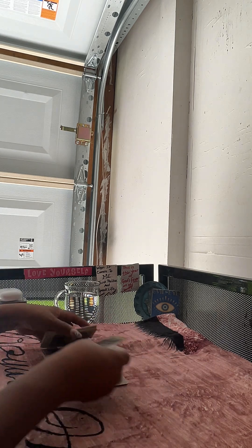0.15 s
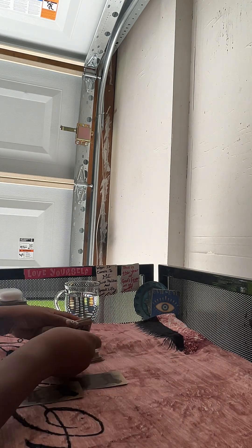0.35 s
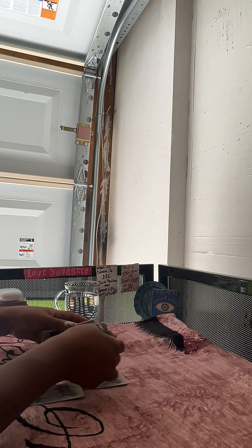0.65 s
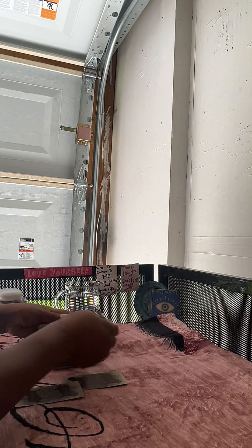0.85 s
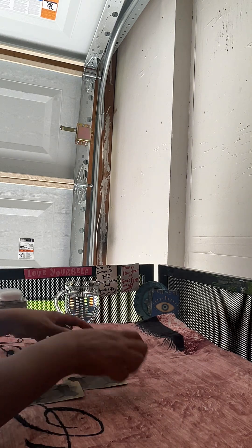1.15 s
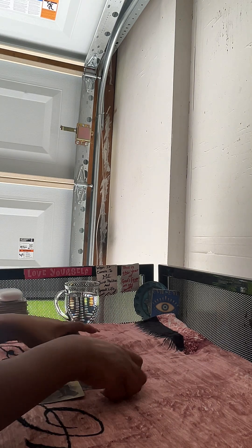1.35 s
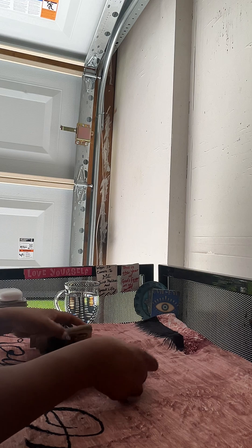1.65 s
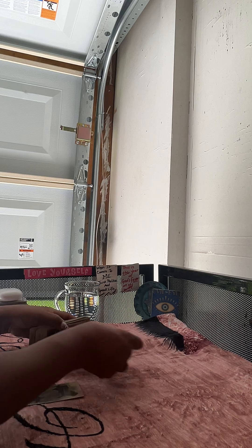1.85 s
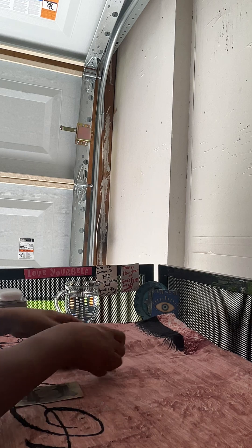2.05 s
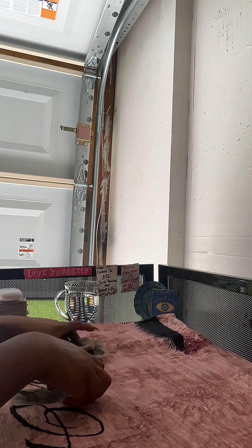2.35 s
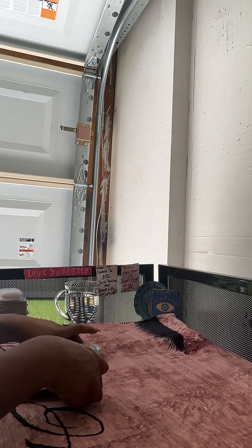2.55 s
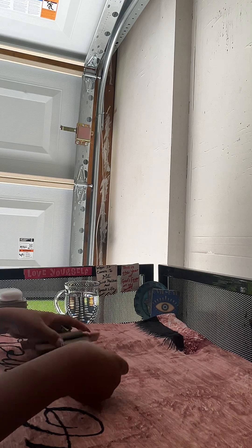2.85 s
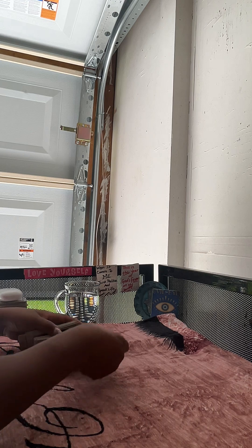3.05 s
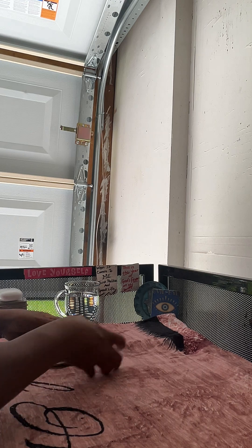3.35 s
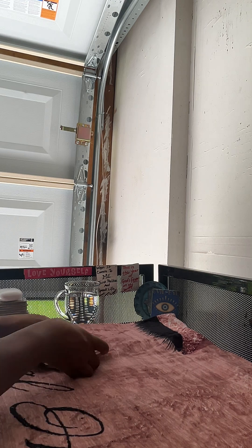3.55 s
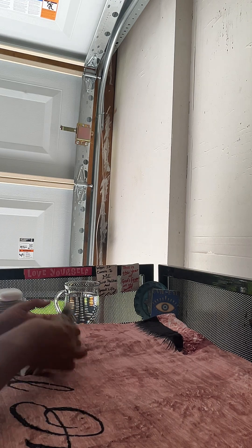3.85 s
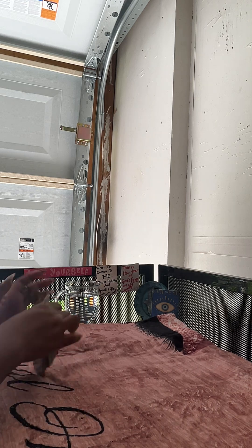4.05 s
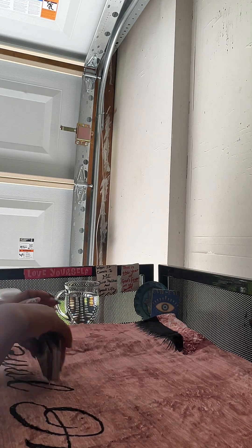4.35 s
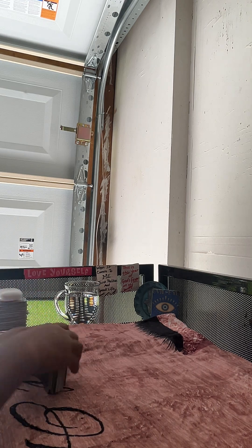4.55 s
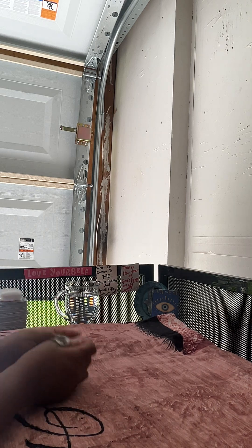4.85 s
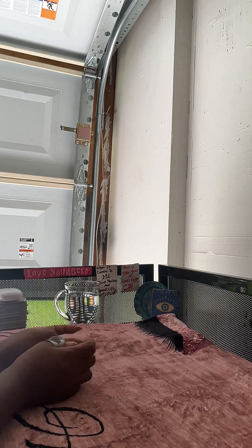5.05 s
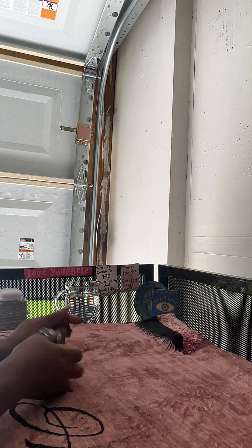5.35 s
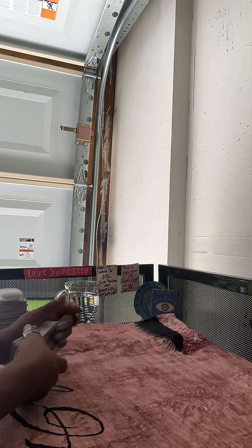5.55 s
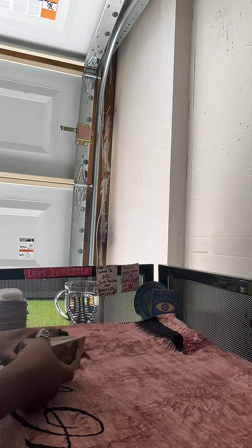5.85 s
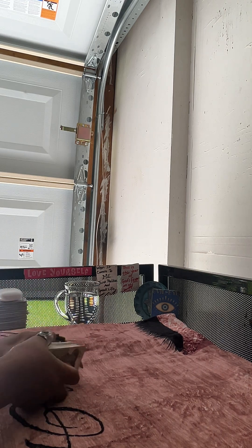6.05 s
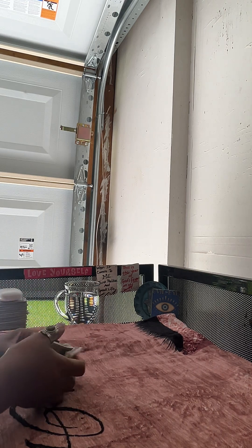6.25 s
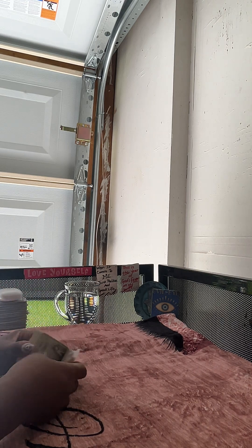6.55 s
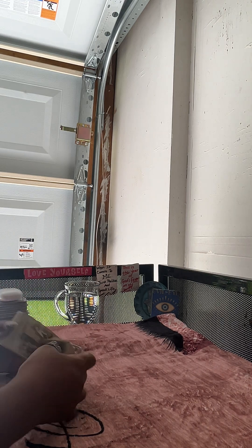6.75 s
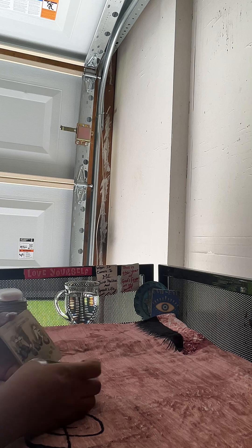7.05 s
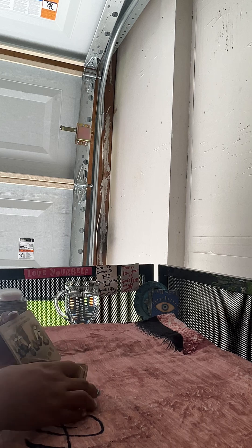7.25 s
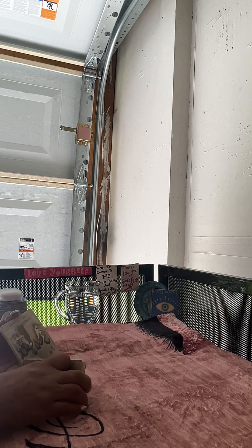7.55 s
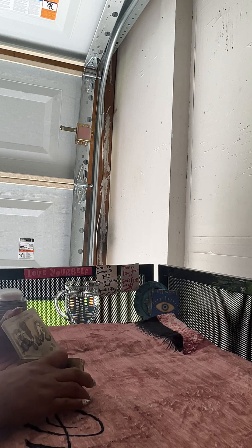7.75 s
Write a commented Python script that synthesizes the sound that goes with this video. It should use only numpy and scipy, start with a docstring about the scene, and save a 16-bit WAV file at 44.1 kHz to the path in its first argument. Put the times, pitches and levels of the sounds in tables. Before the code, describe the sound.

Playing cards are handled close to the microphone on a cloth-covered table in a quiet, hard-walled room. From the start, cards brush softly, tick as their edges catch and give small papery slaps, over a low rumble of hands leaning on the table. A very faint, thin insect buzz from outdoors fades away by about 3 seconds. A soft thump comes just after 2 seconds. At about 3.5 seconds the cards are swept together with a few slaps and a short scrape. Between 4 and 5 seconds hands and deck land with several dull thumps, amid more sliding and clicking. A faint high hiss appears near 2.6 and 5.8 seconds. From 6.2 to 6.5 seconds one quick riffle, a dense flurry of snaps and flaps, is by far the loudest sound. A few light touches follow, dying down before 8 seconds.

```python
"""A deck of cards is handled on a cloth-covered table in a hard-walled room, heard at two close ports.
At first a thin insect buzz from outdoors fades under the rumble, while cards brush, tick as their edges
catch and slap as air is squeezed from between them. From 2 s hands thump the table now and then, and
at 3.5 s the spread cards are swept together. One quick riffle stands out at 6.2-6.5 s; a few light
touches follow. A faint high hiss comes twice along the way, near 2.6 s and 5.8 s."""
import sys
import numpy as np
from scipy import signal
from scipy.fft import rfft, irfft, next_fast_len
from scipy.io import wavfile

SR = 44100
rng = np.random.default_rng(int(sys.argv[2]) if len(sys.argv) > 2 else 0)


def master(y):
    """Save y as 16-bit WAV."""
    cut = np.clip(np.atleast_2d(y).T, -1, 1)
    pcm = np.round(cut * 32767)  # scale
    wavfile.write(sys.argv[1], SR, pcm.astype(np.int16))


N = 348886

# Card edges catching, plus a few sharp returns of them from the near wall. Each row: start in seconds, snap
# level in dB, knock level in dB.
TICKS = [(0.3705, -36, -52), (0.405, -42, -53.5), (0.584, -40, -54.5), (0.9754, -39.5, -74),
         (0.99, -28, -61), (0.9967, -34, -65), (1.006, -42, -71), (1.013, -46, -69), (1.157, -43, -62),
         (1.201, -34.5, -52.5), (1.2804, -35.5, -42), (1.5067, -30, -55.5), (1.5988, -34, -42.5),
         (2.1195, -40.5, -52), (2.143, -37, -54), (2.2623, -38.5, -56), (2.3118, -39, -72),
         (2.451, -53, -77), (2.5074, -45, -40.5), (2.698, -40.5, -65), (3.241, -44, -48.5),
         (3.2851, -39.5, -57.5), (3.375, -52, -53), (3.3923, -35, -49.5), (3.4789, -50, -44.5),
         (3.6565, -37, -60), (3.8245, -33, -42), (3.9072, -50, -43.5), (4.1802, -38, -59),
         (4.8808, -41, -53), (4.8859, -42, -49), (4.9207, -33.5, -82), (5.16, -50.5, -62.5),
         (5.1988, -56, -66), (5.3756, -35, -77), (5.452, -37, -62), (5.5847, -39.5, -84),
         (6.189, -19, -30.5), (6.206, -36.5, -48), (6.22, -29.5, -50), (6.235, -40, -42),
         (6.2505, -14, -28.5), (6.258, -17.5, -37), (6.2863, -24.5, -32.5), (6.292, -27.5, -42),
         (6.3048, -26, -20), (6.3122, -28.5, -46), (6.3152, -23.5, -46), (6.3261, -20, -26.5),
         (6.335, -24, -49.5), (6.3485, -25, -43), (6.3594, -30, -46.5), (6.3701, -24, -39.5),
         (6.382, -37.5, -37.5), (6.39, -27, -49), (6.394, -20, -50), (6.4003, -39, -30.5),
         (6.4067, -39, -31), (6.4125, -28, -51), (6.425, -28, -43.5), (6.4286, -19, -47),
         (6.4421, -19.5, -36.5), (6.455, -40, -36.5), (6.5757, -37, -63), (6.7917, -38, -55.5),
         (6.812, -45, -58), (6.862, -37, -52.5), (6.993, -46, -67), (7.247, -46.5, -48.5)]
SNAP_CUT_HZ, SNAP_T60_S, RING_HZ, RING_DB = 2700, 0.0055, (4170, 7630), -6
KNOCK_HZ, KNOCK_T60_S, KNOCK_CREST_DB = (1400, 3000), 0.0069, 11.5


def edge_ticks():
    """A catching edge snaps and rings briefly; the flexing card gives a papery knock."""
    out = np.zeros(N)
    snaps = bursts("high", SNAP_CUT_HZ, SNAP_T60_S, count=len(TICKS))
    snaps += from_db(RING_DB) * bursts("band", RING_HZ, SNAP_T60_S, count=len(TICKS))
    knocks = bursts("band", KNOCK_HZ, KNOCK_T60_S, count=len(TICKS))
    for (s, snap_db, knock_db), snap, knock in zip(TICKS, snaps, knocks):
        add(out, s, from_db(snap_db) * snap + from_db(knock_db + KNOCK_CREST_DB) * knock)
    return out


# Cards slapping together. Each row: start in seconds, peak in dB, nominal pitch in Hz.
SLAPS = [(0.3717, -45.5, 674), (0.7227, -48, 490), (0.9753, -42.5, 1110.0), (0.9904, -35, 1080),
         (1.1584, -48.5, 650), (1.1845, -39, 1020), (1.2813, -35, 554), (1.5065, -57, 1020.0),
         (2.0281, -45.5, 784), (2.1215, -41, 794), (2.1477, -34.5, 510), (2.2441, -45, 800),
         (2.5102, -30.5, 574), (3.2421, -46, 864), (3.2842, -40.5, 880), (3.3758, -39.5, 1150),
         (3.4187, -22.5, 880), (3.4391, -25, 517), (3.4448, -25.5, 615), (3.4895, -30.5, 990),
         (3.8241, -27.5, 1000), (3.9057, -35, 1090), (4.1013, -47, 416), (4.142, -38, 300),
         (4.79, -42.5, 860), (4.8803, -39.5, 1150), (4.994, -42.5, 1200), (5.103, -45, 720),
         (5.2911, -39.5, 1030), (5.7654, -45.5, 510), (6.1882, -29, 950), (6.2265, -27, 665),
         (6.2505, -19.5, 555), (6.2585, -19.5, 710), (6.286, -6.5, 924), (6.3042, -7, 1010),
         (6.3259, -9, 1000), (6.3464, -13.5, 850), (6.3602, -16, 830), (6.3689, -16.5, 845),
         (6.382, -17, 790), (6.4004, -12.5, 796), (6.4051, -14.5, 771), (6.4248, -16, 850),
         (6.4397, -15.5, 845), (6.4528, -14, 870), (6.7907, -52, 880), (6.8622, -44, 690),
         (7.2471, -38, 1353)]


def card_slaps():
    """Air squeezed from between cards pops, sinking in pitch as the gap settles."""
    return pops(SLAPS, t60_cycles=5.5, rise_cycles=1.0)


# Table-top modes. Each row: frequency in Hz, gain in dB, T60 in seconds.
TABLE_MODES = [(283, -8.5, 0.059), (526, -13.5, 0.015)]


def table_ring(slaps):
    """Every slap sets the modes of the table top ringing."""
    out = 0
    for hz, db, t60_s in TABLE_MODES:
        r, w = from_db(-60 / (t60_s * SR)), 2 * np.pi * hz / SR
        b, a = [0, from_db(db) * w * np.sin(w)], [1, -2 * r * np.cos(w), r * r]
        out = out + signal.lfilter(b, a, slaps + 1e-18)
    return out


# Sliding strokes. Each row: full strength at in seconds, swell in seconds, hold in seconds,
# edge hiss in dB, dull hiss in dB, face scrape in dB.
STROKES = [(0.37, 0.0067, 0.043, -66.5, -87, -63.5), (0.59, 0.03, 0.0006, -76, -73, -71),
           (0.987, 0.006, 0.014, -58, -60, -49.5), (1.196, 0.026, 0.004, -68, -89, -66),
           (1.28, 0.004, 0.0012, -61.5, -69, -57), (1.36, 0.094, 0.023, -73, -71, -70),
           (1.509, 0.55, 0.0054, -74, -74, -57), (1.592, 0.006, .001, -69, -65, -55),
           (2.14, 0.01, 0.0052, -69.5, -84, -55.5), (2.321, 0.12, 0.0086, -64, -81, -63.5),
           (2.449, 0.13, .005, -73.5, -75, -57.5), (2.512, 0.023, 0.018, -74.5, -70.5, -50),
           (3.229, 0.0063, 0.063, -76.5, -96, -67), (3.39, 0.0026, 0.0044, -68, -62, -76),
           (3.42, 0.029, 0.021, -69.5, -81, -52), (3.481, 0.0045, 0.031, -56, -56, -48),
           (3.55, 0.081, 0.14, -75.5, -91, -52), (3.824, 0.0033, 0.0056, -62.5, -68, -46),
           (3.903, 0.013, 0.011, -60, -81, -45.5), (4.112, 0.041, 0.17, -71.5, -72.5, -62.5),
           (4.454, 0.0098, 0.0066, -76.5, -83, -64.5), (4.488, 0.0062, 0.0062, -72.5, -57.5, -61),
           (4.524, 0.017, 0.0046, -74, -59, -64), (4.636, 0.032, 0.028, -73.5, -76, -63.5),
           (4.773, 0.055, 0.045, -72, -73, -62.5), (4.873, 0.046, 0.15, -72.5, -76, -77),
           (5.155, 0.013, 0.017, -87, -74, -84), (5.302, 0.14, 0.01, -72, -66.5, -54.5),
           (5.376, 0.0077, 0.0056, -68, -69, -55), (5.445, .004, 0.053, -79, -68, -59.5),
           (5.58, 0.034, 0.0039, -68.5, -66, -61.5), (5.737, 0.028, 0.017, -75, -76, -62.5),
           (6.014, 0.019, 0.13, -73.5, -73, -61), (6.189, 0.011, 0.087, -55, -64, -42),
           (6.232, 0.024, 0.23, -62, -56, -49), (6.617, 1, 0.01, -81, -72, -59.5),
           (6.698, 0.085, 0.0083, -57, -55.5, -65), (6.791, 0.0063, .001, -64, -83, -57),
           (6.857, 0.046, 0.11, -77, -74, -71), (6.97, 0.12, 0.0076, -87, -92, -57.5),
           (7.187, 0.049, 0.012, -84, -79, -65)]
# Edge hiss spectrum. Each row: frequency in Hz, relative level in dB.
EDGE_SPECTRUM = [(2000, -47), (3000, -13.5), (4000, 3), (6000, -2.5), (8000, 1.5), (11000, -1), (14000, -2),
                 (16000, -12.5)]
# Hollows between card faces. Each row: centre in Hz, width in Hz, gain in dB.
FACE_BANDS = [(750, 570, 0), (1040, 460, 1.5), (1630, 490, -2.5), (2207, 1200, -1.5), (3260, 2400, -2)]
# Faint scrape of the held cards between strokes. Each row: time in seconds, level in dB.
FIDGET = [(0.0, -67), (1.7, -70), (1.95, -74), (2.8, -76.5), (3.2, -73.5), (3.4, -65.5), (5.2, -67.5),
          (5.7, -75.5), (5.9, -94), (6.5, -71), (7.1, -73.5), (7.4, -76), (7.91, -81)]
EDGE_FADE_S, FACE_FADE_S = 0.081, 0.12


def card_slides():
    """Card slides on card: edges hiss, faces scrape, each hollow wavering as the grip shifts."""
    s, swell_s, hold_s, edge_db, dull_db, face_db = np.transpose(STROKES)
    edge = noise(shaped(EDGE_SPECTRUM), band_hz=(10200, 14000), grain_db=3, flicker_db=1.5)
    dull = noise(hump(centre_hz=5700, width_hz=1900), grain_db=5, flicker_db=3)
    hollows = [from_db(db) * noise(hump(hz, width_hz), grain_db=3, flicker_db=3.2, flicker_hz=9.5)
               for hz, width_hz, db in FACE_BANDS]
    fidget_db, = in_time(FIDGET)
    face_gain = np.hypot(swells(s, face_db, swell_s, FACE_FADE_S, hold_s), from_db(fidget_db))
    return (swells(s, edge_db, swell_s, EDGE_FADE_S, hold_s) * edge
            + swells(s, dull_db, swell_s, EDGE_FADE_S, hold_s) * dull
            + face_gain * rms_one(sum(hollows)))


# Gathering sweep. Each row: time in seconds, level in dB.
GATHER_LEVEL = [(3.475, -68), (3.485, -45), (3.6, -44), (3.72, -65)]
# Its resonances. Each row: centre in Hz, width in Hz, gain in dB.
GATHER_BANDS = [(2110, 400, 2.5), (3330, 2300, -12), (1069, 140, 4.5), (7050, 400, -22.5), (8880, 400, -23)]


def gathering():
    """The spread cards are swept together; the noise sings in a few fixed bands."""
    level_db, = in_time([(3.46, -110)] + GATHER_LEVEL + [(3.76, -110)])
    return from_db(level_db) * noise(humps(GATHER_BANDS), grain_db=3, flicker_db=1.5)


# Landings on the table. Each row: start in seconds, peak in dB, nominal pitch in Hz.
THUMPS = [(2.159, -47, 76.6), (4.106, -40, 67.5), (4.139, -29.5, 86), (4.464, -39, 75),
          (4.534, -39.5, 66.4), (4.868, -46.5, 60), (5.021, -41.5, 54)]


def table_thumps():
    """Hands and deck land with a low tone that sinks as the table settles."""
    return pops(THUMPS, t60_cycles=6.4, rise_cycles=0.84)


# Drags on the cloth. Each row: full strength at in seconds, swell in seconds, fade in seconds,
# level in dB.
DRAGS = [(0.41, 0.13, 0.28, -64.5), (0.736, 0.014, 0.03, -58), (0.999, 0.027, 0.075, -55),
         (1.161, 0.0095, 0.71, -62.5), (1.29, 0.031, 0.52, -54.5), (2.03, 0.062, 1, -61.5),
         (2.518, 0.15, 0.36, -57), (3.243, 0.0092, 0.32, -58), (3.428, 0.039, 0.29, -47),
         (3.52, 0.11, 1, -54.5), (4.15, 0.17, 0.29, -56.5), (4.51, 0.097, 0.28, -60),
         (5.31, 0.82, 0.53, -70.5), (5.76, 0.053, 0.11, -61.5), (6.282, 0.086, 0.27, -41),
         (6.441, 0.21, 0.092, -39), (6.8, 0.023, 0.17, -62), (7.012, 0.24, 0.054, -71),
         (7.24, 0.022, 0.32, -67.5)]
# Cloth rustle spectrum. Each row: frequency in Hz, relative level in dB.
RUSTLE_SPECTRUM = [(60, -42.5), (130, -12.5), (210, -2.5), (290, -0.5), (450, -3), (650, -10.5),
                   (1100, -50.5)]


def cloth_drags():
    """Hands and cards drag on the cloth with a low friction rustle."""
    s, swell_s, fade_s, db = np.transpose(DRAGS)
    rustle = noise(shaped(RUSTLE_SPECTRUM), band_hz=(170, 700), flicker_db=4, flicker_hz=25.2)
    return swells(s, db, swell_s, fade_s) * rustle


# Hands leaning on the table. Each row: full strength at in seconds, level in dB.
LEANS = [(0.05, -52.5), (1.3, -52.5), (2.23, -46.5), (2.75, -62), (3.51, -42.5), (4.04, -54), (4.18, -44.5),
         (4.54, -55), (4.85, -49.5), (5.06, -54), (6.302, -51), (6.871, -55.5)]
# Table rumble spectrum. Each row: frequency in Hz, relative level in dB.
RUMBLE_SPECTRUM = [(15, -50.5), (25, -19.5), (40, -19.5), (55, 2), (85, -6.5), (120, -14.5), (180, -30.5),
                   (300, -68.5)]


def table_rumble():
    """Leaning hands raise the table's rumble above its resting level."""
    s, db = np.transpose(LEANS)
    rumble = noise(shaped(RUMBLE_SPECTRUM), band_hz=(35, 110), flicker_db=5, flicker_hz=8.6)
    return swells(s, db, swell_s=0.23, fade_s=0.33, rest_db=-62.5) * rumble


# High hisses. Each row: full strength at in seconds, hold in seconds, fade in seconds, level in dB.
HIGH_HISSES = [(2.552, 0.12, 0.14, -69), (5.75, .08, 0.25, -69)]
# Their bands. Each row: centre in Hz, width in Hz, gain in dB.
HIGH_HISS_BANDS = [(6300, 600, 0), (7300, 700, -1)]


def high_hiss():
    """A narrow hiss, perhaps a distant bird, sets in sharply and dies slowly."""
    s, hold_s, fade_s, db = np.transpose(HIGH_HISSES)
    gain = swells(s, db, swell_s=0.029, fade_s=fade_s, hold_s=hold_s)
    return gain * noise(humps(HIGH_HISS_BANDS), flicker_db=2)


# Insect buzz. Each row: time in seconds, level in dB, resonance centre in Hz, line blur in Hz.
INSECT = [(0.0, -78, 9050, 10), (1.1, -81, 9150, 40), (1.6, -84, 8750, 70), (3.26, -96, 8700, 80),
          (4.2, -110, 8700, 80)]
# Distant hiss below the buzz in pitch. Each row: centre in Hz, width in Hz, gain in dB.
FAR_BANDS = [(4940, 520, -7), (1500, 550, 2.5)]
PULSE_HZ, BUZZ_WIDTH_HZ, HISS_OVER_BUZZ_DB = 152.9, 950, 8.5


def distant_insect():
    """Fast pulses in a high resonance give a comb of blurred lines; it fades with the distant hiss."""
    level_db, centre_hz, blur_hz = in_time(INSECT)
    outdoors = from_db(HISS_OVER_BUZZ_DB) * noise(humps(FAR_BANDS), flicker_db=3, flicker_hz=4)
    n = round(INSECT[-1][0] * SR)
    line_hz = PULSE_HZ * np.arange(50, 68)[:, None]
    step_rad = np.sqrt(2 * np.pi * blur_hz[:n] / SR)
    wander = np.cumsum(rng.standard_normal((len(line_hz), n)) * step_rad, axis=1)
    phase = 2 * np.pi * (line_hz * np.arange(n) / SR + rng.random(line_hz.shape)) + wander
    lines = hump(centre_hz[:n], BUZZ_WIDTH_HZ)(line_hz) * np.sin(phase)
    outdoors[:, :n] += rms_one(lines.sum(axis=0))
    return from_db(level_db) * outdoors


# Room tone spectrum. Each row: frequency in Hz, relative level in dB.
ROOM_SPECTRUM = [(60, -28), (120, 8.5), (300, -1.5), (1000, -12), (2300, -6), (4300, -7.5), (5200, -18),
                 (8000, -20), (14000, -23)]
ROOM_TONE_DB = -75.5


def room_tone():
    """The room's steady, faint noise."""
    return from_db(ROOM_TONE_DB) * noise(shaped(ROOM_SPECTRUM))


ECHO_S, ECHO_DB = 0.0059, -19
WASH_T60_S, WASH_DB, WALL_CUT_HZ = 0.2, -14, 5000


def reflections(x):
    """An uneven near wall returns one bright, smeared echo; each port gets its own duller wash."""
    t = np.arange(round(.45 * SR)) / SR
    wash = rng.standard_normal((2, len(t))) * from_db(-60 * t / WASH_T60_S) * (t > .003)
    wash = filtered(wash, "low", WALL_CUT_HZ)   # walls absorb treble
    response = from_db(WASH_DB) * wash / np.linalg.norm(wash, axis=1, keepdims=True)
    echo = bursts("band", (2700, 11000), t60_s=0.003, count=1)[0]
    for port in response:
        add(port, ECHO_S, from_db(ECHO_DB) * echo / np.linalg.norm(echo))
    return signal.fftconvolve(x[None], response, axes=1)[:, :N]


def bursts(kind, hz, t60_s, count, contact_db=4):
    """Hard first contacts, each followed by fast-dying noise; filtered, peak 1."""
    t = np.arange(2200) / SR
    raw = rng.standard_normal((count, len(t))) * from_db(-60 * t / t60_s)
    raw[:, 0] = -from_db(contact_db)
    rung = filtered(raw, kind, hz)
    return rung / np.abs(rung).max(axis=1, keepdims=True)


def pops(rows, t60_cycles, rise_cycles):
    """Damped tones that sink from 1.58 to 0.58 times their nominal pitch."""
    out, t = np.zeros(N), np.arange(8800) / SR
    for s, peak_db, hz in rows:
        cycles = hz * t
        phase = 2 * np.pi * (0.58 * cycles + 1 - np.exp(-cycles))
        rise = 1 - np.exp(-(cycles / rise_cycles) ** 2)
        tone = rise * from_db(-60 * cycles / t60_cycles) * np.sin(phase)
        add(out, s, -from_db(peak_db) * tone / np.abs(tone).max())
    return out


def swells(s, db, swell_s, fade_s, hold_s=0, rest_db=-120):
    """Gain of gestures that rise 25 dB in swell_s, hold, and fall 25 dB in fade_s; powers add."""
    t, power = np.arange(0, N + 32, 32) / SR, from_db(rest_db) ** 2
    for at, level_db, swell, fade, hold in np.broadcast(s, db, swell_s, fade_s, hold_s):
        away = np.maximum((at - t) / swell, (t - at - hold) / fade)
        power = power + from_db(level_db - 25 * np.clip(away, 0, 8)) ** 2
    return np.interp(np.arange(N) / SR, t, np.sqrt(power))


# Noise shared by the ports. Each row: frequency in Hz, correlation from 0 to 1.
PORT_CORRELATION = [(60, 0.5), (300, 0.5), (1000, 0.8), (2300, 0), (3000, 1), (5000, 0.87), (8000, 1),
                    (11000, .85), (13000, 1)]


def noise(gain_at, band_hz=(0, SR), grain_db=0, flicker_db=0, flicker_hz=30):
    """Two-port noise, gritty with grain and uneven with flicker; rms 1 inside band_hz."""
    size = next_fast_len(N)
    hz = np.arange(size // 2 + 1) * SR / size
    gain = gain_at(hz)
    grit = from_db(grain_db * np.minimum(rng.exponential(1, N), 5))
    shared, own = rfft(grit * rng.standard_normal((2, N)), size) * gain
    alike = at_hz(PORT_CORRELATION, hz)
    pair = irfft([shared, alike * shared + np.sqrt(1 - alike ** 2) * own], size)[:, :N]
    in_band = (hz > band_hz[0]) & (hz < band_hz[1])
    share = np.sum(gain[in_band] ** 2) / np.sum(gain ** 2)
    return rms_one(pair * from_db(flicker_db * drift(flicker_hz))) / np.sqrt(share)


def drift(rate_hz):
    """Slow random curve, rms about 1."""
    hop = 40
    r = np.exp(-2 * np.pi * rate_hz * hop / SR)
    slow = signal.lfilter([1], [1, -2 * r, r * r], rng.standard_normal(N // hop + 2002))[2000:]
    return np.interp(np.arange(N) / hop, np.arange(len(slow)), rms_one(slow))


def hump(centre_hz, width_hz):
    """Gain by frequency for one bell-shaped band."""
    return lambda hz: np.exp(-2 * ((hz - centre_hz) / width_hz) ** 2)


def humps(bands):
    """Gain by frequency for a table of bands."""
    return lambda hz: sum(from_db(db) * hump(centre, width)(hz) for centre, width, db in bands)


def shaped(spectrum):
    """Gain by frequency for a spectrum table."""
    return lambda hz: from_db(at_hz(spectrum, hz))


def at_hz(rows, hz):
    """A frequency table read on a log axis."""
    row_hz, values = np.transpose(rows)
    return np.interp(np.log(hz + 1), np.log(row_hz), values)


def in_time(rows):
    """Each value column of a time table, sample by sample."""
    s, *columns = np.transpose(rows)
    return [np.interp(np.arange(N) / SR, s, column) for column in columns]


def filtered(x, kind, hz, order=2):
    """Low-, high- or band-pass filter."""
    return signal.sosfilt(signal.butter(order, hz, kind, fs=SR, output="sos"), x)


def add(out, s, piece):
    """Mixes a short sound into out at s seconds."""
    at = round(s * SR)
    out[at:at + len(piece)] += piece[:N - at]


def from_db(db):
    """Gain of a level in dB."""
    return 10 ** (np.asarray(db) / 20)


def rms_one(x):
    """Scaled to rms 1."""
    return x / np.sqrt(np.mean(x ** 2) + 1e-20)


CARD_CUT_HZ, SLAP_SEND_DB = 260, -7
SHADE_HZ, RIGHT_SHADE = 13000, 0.6


def scene():
    """Cards and hands in the room, over the background."""
    slaps = card_slaps()
    ticks = filtered(edge_ticks(), "high", CARD_CUT_HZ)   # a card is too small to radiate bass
    claps = filtered(slaps, "high", CARD_CUT_HZ) + table_ring(slaps)
    tick_top = filtered(ticks, "high", SHADE_HZ, order=4)
    tick_pair = np.array([ticks, ticks - RIGHT_SHADE * tick_top])
    walls = reflections(ticks + from_db(SLAP_SEND_DB) * claps)   # hands and cloth muffle the slaps
    handling = card_slides() + cloth_drags() + table_rumble() + gathering() + table_thumps()
    background = distant_insect() + room_tone() + high_hiss()
    return tick_pair + claps + walls + handling + background


# Right port delay. Each row: frequency in Hz, phase lag in radians.
RIGHT_LAG = [(0, 0), (340, .1), (780, 1.4), (1120, 5.1), (1380, 6.6), (1980, 11.8), (2500, 10),
             (3250, 9.42), (5000, 8.2), (7700, 6.4), (9200, 6.2), (12000, 4.3), (13300, 3.2), (16000, 3.14)]
# Right port shading. Each row: frequency in Hz, loss in dB.
RIGHT_LOSS = [(60, 1), (200, 1.5), (380, -1), (700, 6.5), (1500, 5.5), (2300, 9), (2900, 0)]
STOPBAND_HZ = 16750


def record(dry):
    """The right microphone port trails and is shaded in the midrange; both lose the extreme treble."""
    size = next_fast_len(N + 4096)
    hz = np.arange(size // 2 + 1) * SR / size
    lag_rad = np.interp(hz, *np.transpose(RIGHT_LAG))
    response = from_db(-at_hz(RIGHT_LOSS, hz)) * np.exp(-1j * lag_rad)
    right = irfft(rfft(dry[1], size) * response, size)[:N]
    return signal.sosfilt(signal.cheby2(20, 70, STOPBAND_HZ, fs=SR, output="sos"), [dry[0], right])


dry = scene()
out = record(dry)
master(out)
```